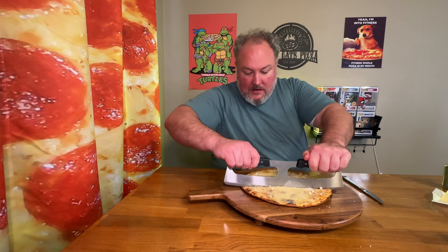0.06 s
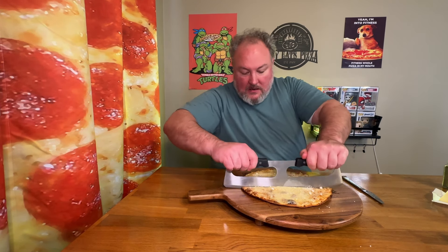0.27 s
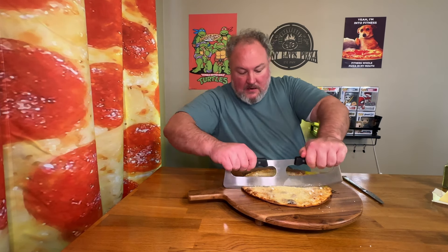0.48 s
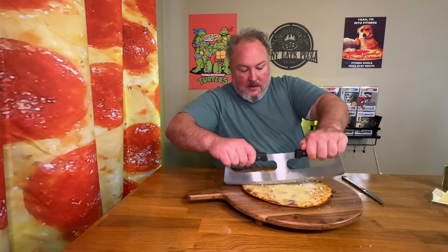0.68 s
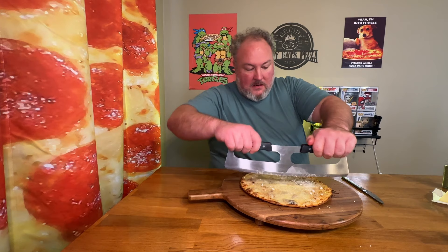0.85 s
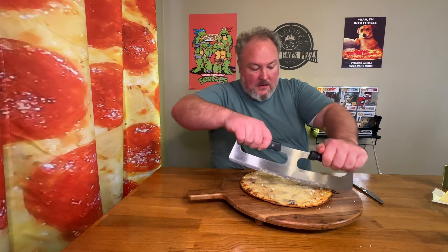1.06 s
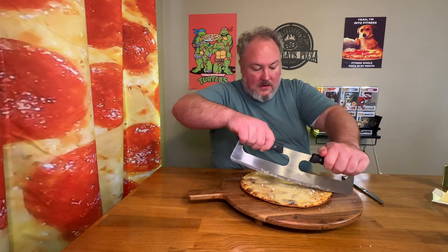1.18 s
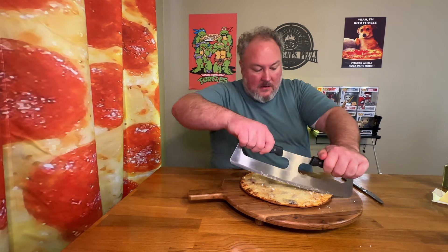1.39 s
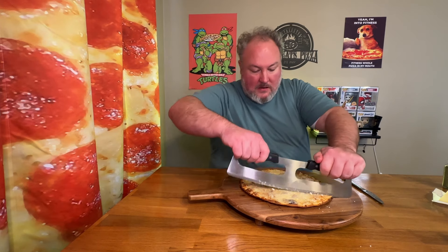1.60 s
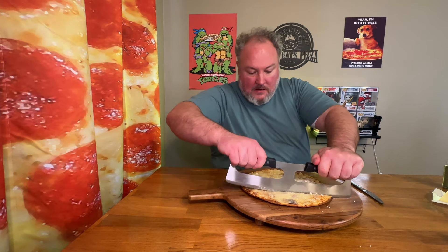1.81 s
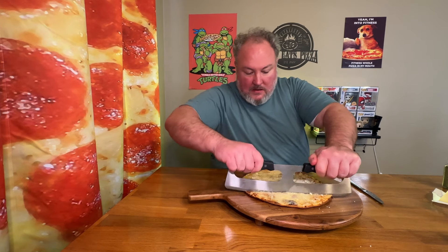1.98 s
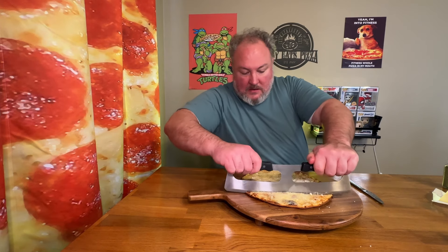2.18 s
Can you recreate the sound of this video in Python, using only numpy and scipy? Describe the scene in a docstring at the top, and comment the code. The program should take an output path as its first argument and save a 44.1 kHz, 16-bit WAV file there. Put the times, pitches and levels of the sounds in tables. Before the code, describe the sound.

Crisp pizza crust crackles and snaps under a steel blade, which hits a wooden board with a low thud. After a click and a short pause, longer crunching ends in two knocks, close by in a hushed kitchen.

```python
"""In a small, hushed kitchen a steel rocker cutter bites through crisp pizza crust, which crumbles and
snaps by brittle fracture and rasps the blade. The edge knocks on the wooden board and rings its modes;
each blow shakes the table and leaves a low boom. The cutter pulls clear with a click, comes down softly
on one end and rocks through the crust again, crunching, to two more firm knocks."""
import sys
import numpy as np
from scipy import signal
from scipy.fft import rfft, irfft, next_fast_len
from scipy.io import wavfile
from scipy.ndimage import map_coordinates

SR = 44100
rng = np.random.default_rng(int(sys.argv[2]) if len(sys.argv) > 2 else 0)


def to_wav(sig):
    """Store sig (one row per channel, or 1-D mono) as 16-bit WAV at the path in sys.argv[1].

    Samples outside -1..1 are clipped; the rate is SR.
    """
    pcm = np.clip(np.atleast_2d(sig), -1, 1) * 32767
    pcm = np.round(pcm).astype(np.int16)
    wavfile.write(sys.argv[1], SR, pcm.T)  # frames by channels


N = 99225

# blows of the blade on the board
# (time [s], ring level [dB], favoured pitch [Hz], thud level [dB], boom level [dB], boom pitch [Hz])
BLOWS = [(0.1672, -25.5, 1450, -42, -80, 79.3), (0.2181, -18, 2830, -22, -83, 81.8),
         (0.2207, -9.5, 600, -21, -30.5, 81.5), (.635, -42, 790, -40.5, -45.5, 81.5),
         (1.304, -37, 275, -35.5, -38, 57.8), (1.801, -39.5, 560, -52, -46, 89.2),
         (1.893, -19.5, 790, -25, -37, 79.1), (2.1325, -26, 950, -36, -48, 53.9)]
# dull spectrum of breaking crust (frequency [Hz], relative level [dB])
CRUNCH_SPECTRUM = [(300, -12), (650, -1), (1150, 1), (1500, 6), (2050, 0), (3000, 6), (4200, -11.5),
                   (12000, -60)]
# bright spectrum of breaking crust (frequency [Hz], relative level [dB])
CRISP_SPECTRUM = [(1000, -18), (3000, 0.5), (4900, 1), (6300, -7), (7600, 3), (8400, 1), (9900, -11),
                  (11800, -5.5), (13800, -5), (16000, -7.5)]
# response of the table (frequency [Hz], relative level [dB])
TABLE_SPECTRUM = [(25, -3), (60, 7.5), (140, -7.5), (260, -11), (500, -37.5), (1500, -66.5)]


def amp(db):
    """Amplitude ratio of a level in decibels."""
    return 10 ** (np.asarray(db) / 20)


def unit(x):
    """Normalisation to rms 1."""
    return x / np.sqrt(np.mean(x ** 2) + 1e-20)


def along(points, hz):
    """Interpolation of (frequency [Hz], value) points on a logarithmic frequency axis."""
    f, v = np.transpose(points)
    return np.interp(np.log(hz + 1), np.log(f + 1), v)


def colour(x, spectrum):
    """Minimum-phase filtering at unit energy, shaped by (frequency [Hz], level [dB]) points."""
    size = 4096
    cepstrum = irfft(np.log(amp(along(spectrum, np.fft.rfftfreq(size, 1 / SR)))))
    cepstrum[1:size // 2] *= 2  # folding onto positive time makes the filter causal
    cepstrum[size // 2 + 1:] = 0
    response = irfft(np.exp(rfft(cepstrum)))
    return signal.fftconvolve(x, response / np.linalg.norm(response))[:len(x)]


def add(track, start_s, sound):
    """Superposition of a sound on a track."""
    i = max(round(start_s * SR), 0)
    track[i:i + len(sound)] += sound[:N - i]


def wobble(knots_per_s):
    """Smooth random modulation: a spline through Gaussian values."""
    return map_coordinates(rng.standard_normal(1000), [np.arange(N) * knots_per_s / SR], mode="wrap")


def room_tone():
    """Stationary background noise, faint and strongest in the bass."""
    # (frequency [Hz], relative level [dB])
    hush_spectrum = [(25, 12), (62, -2.5), (110, -11.5), (480, -18.5), (1050, -28.5), (1400, -16.5),
                     (2100, -29.5), (16000, -43)]
    return amp(-58) * unit(colour(rng.standard_normal(N), hush_spectrum))


def bite_envelopes():
    """Amplitude envelopes of crunch and treble: each bite rises, holds and falls, advancing in jerks."""
    # the blade sinks into the crust (time [s], duration [s], crunch level [dB], treble level [dB])
    bites = [(0.01, 0.032, -53, -54), (0.054, 0.2, -56, -58), (0.165, 0.038, -46, -45),
             (0.381, 0.037, -55.5, -56), (0.557, 0.055, -67, -71), (0.625, 0.027, -51, -57.5),
             (1.247, 0.234, -87, -72.5), (1.473, .08, -56, -55), (1.567, .145, -47.5, -54.5),
             (1.619, 0.01, -43, -53.5), (1.751, 0.073, -51.5, -60.5), (1.784, 0.038, -42, -49.5),
             (1.883, 0.048, -40, -46), (1.989, 0.06, -42.5, -48), (2.06, 0.06, -58, -53.5),
             (2.14, 0.035, -43.5, -48)]
    rise_s, fall_s, jerk_db = 0.0032, 0.0071, 3.5
    t, gains = np.arange(N) / SR, 0
    for start, length, crunch_db, treble_db in bites:
        shape = np.exp(-np.maximum(start - t, 0) / rise_s - np.maximum(t - start - length, 0) / fall_s)
        gains = gains + amp([[crunch_db], [treble_db]]) * shape
    return gains * amp(jerk_db * wobble(knots_per_s=160))


def grains(per_s):
    """A Poisson process: sparse impulses of very uneven size, at rms 1."""
    hits = rng.random(N) < per_s / SR
    size_db = 4.3 * np.minimum(rng.exponential(size=N), 3)
    return unit(hits * amp(size_db) * rng.choice([-1, 1], N))


def blade(force):
    """Forced vibration of the steel's damped modes; it radiates little below the lowest."""
    # resonances of the blade in the cut (frequency [Hz], bandwidth [Hz], relative level [dB])
    modes = [(592, 24, 5), (923, 50, 3), (1425, 70, -5), (1790, 50, -4), (2420, 80, -3.5), (3040, 90, -4.5),
             (3370, 90, -9), (4360, 80, -6.5)]
    t = np.arange(SR // 10) / SR
    response = sum(amp(db) * width * np.exp(-np.pi * width * t) * np.sin(2 * np.pi * hz * t)
                   for hz, width, db in modes)
    response = signal.lfilter(*signal.butter(2, modes[0][0], "highpass", fs=SR), response)
    return signal.fftconvolve(force, response / np.linalg.norm(response))[:N]


def flaking(kinds=12, flakes_per_s=1000, decay_s=.00025):
    """Shot noise of flakes chipping off, each kind with its own spectrum, at rms 1."""
    t = np.arange(SR // 200) / SR
    chips = rng.standard_normal((kinds, len(t))) * np.exp(-t / decay_s)
    return unit(sum(np.convolve(grains(flakes_per_s / kinds), unit(chip))[:N] for chip in chips))


def crumbling():
    """Acoustic emission: tiny cells of crust fail and rasp the blade; pressing hands rumble the table."""
    crunch, treble = bite_envelopes()
    cells = amp(-4.5) * grains(per_s=1200) * crunch
    rasp = blade(cells) + amp(-6) * colour(cells, CRUNCH_SPECTRUM)
    fizz = amp(-1) * colour(flaking() * treble, CRISP_SPECTRUM)
    rumble = amp(-7.5) * crunch * unit(colour(rng.standard_normal(N), TABLE_SPECTRUM))
    return rasp + fizz + rumble


def kitchen(x, wall_delay_s=.008):
    """Reverberation: reflections decay exponentially, the treble first and the midrange last."""
    # decay of the room (frequency [Hz], reverberation time T60 [s])
    decay_times = [(100, 0.37), (1500, 0.66), (4000, 0.4), (16000, 0.33)]
    hz, t, noise = signal.stft(rng.standard_normal(SR), SR, nperseg=256)
    decay = amp(-60 * t / along(decay_times, hz)[:, None])
    tail = signal.istft(noise * decay, SR, nperseg=256)[1]
    tail = np.pad(tail / np.linalg.norm(tail), (round(wall_delay_s * SR), 0))
    return signal.fftconvolve(x, tail)[:N]


def snaps():
    """Brittle fracture: each larger break is a tick, splinters and a dull crack that rings the blade."""
    # breaks in the crust (time [s], relative tick level [dB], relative crack level [dB])
    fractures = [(0.0324, -34.5, -48.5), (0.104, -39.5, -54), (0.1394, -37.5, -50.5), (0.166, -18, -27.5),
                 (0.2009, -29, -31), (0.2175, -21.5, -19), (0.3391, -40, -62), (1.2205, -51.5, -64),
                 (1.2492, -47, -68), (1.2905, -37, -65), (1.3404, -47, -73), (1.3628, -42, -76.5),
                 (1.3928, -41, -55.5), (1.484, -35.5, -58), (1.5151, -31, -53.5), (1.5432, -38.5, -47),
                 (1.5712, -32.5, -41), (1.5906, -31.5, -42.5), (1.6408, -36.5, -46), (1.78, -31.5, -58),
                 (1.787, -34.5, -50), (1.8461, -35, -35), (1.8888, -26, -30), (1.9308, -34, -47),
                 (1.9425, -34, -66), (1.9875, -25.5, -45.5), (2.0665, -38.5, -59), (2.0765, -29.5, -68),
                 (2.084, -31.5, -41), (2.1301, -20, -33.5), (2.1515, -31.5, -37.5)]
    splinter_s, crack_rise_s, crack_decay_s = 0.005, 0.00079, 0.0035
    ticks, cracks, t = np.zeros(N), np.zeros(N), np.arange(SR // 20) / SR
    crack_shape = np.exp(-t / crack_decay_s) * (1 - np.exp(-t / crack_rise_s))
    for start, tick_db, crack_db in fractures:
        tick_noise, splinter_noise, crack_noise = rng.standard_normal((3, len(t)))
        tick_s = .005 * 2 ** (crack_db / 13)  # heavier cracks take longer to break
        tick = tick_noise * np.exp(-t / tick_s)
        tick = amp(10.5) * tick / np.linalg.norm(tick)
        splinters = amp(-17) * splinter_noise * np.exp(-t / splinter_s)
        add(ticks, start + .001, amp(tick_db) * (tick + splinters))
        add(cracks, start + .001, amp(crack_db + 3.5) * crack_noise * crack_shape)
    return colour(ticks, CRISP_SPECTRUM) + colour(cracks, CRUNCH_SPECTRUM) + amp(-3) * blade(cracks)


def knocks(pitch_spread=0):
    """Free vibration: each blow rings the board's modes most strongly near its own favoured pitch."""
    # resonances of the wooden board (frequency [Hz], relative level [dB], decay time T60 [s])
    modes = [(120.2, 1, .2), (185.8, 1.5, 0.12), (272, -4, 0.08), (404.7, -10.5, 0.19), (489, -9.5, 0.12),
             (516.9, -8, 0.13), (597.4, 1.5, 0.074), (681.2, -5, 0.11), (923.6, 1.5, 0.038),
             (1016, -6, 0.059), (1443, 0.5, 0.026), (1930, -1, 0.035), (2880, -3, 0.012)]
    falloff_db_per_octave, contact_s = 9, 0.00047
    out, t = np.zeros(N), np.arange(SR // 3) / SR
    for start, ring_db, favoured_hz, *_ in BLOWS:
        ring = 0
        for hz, mode_db, t60 in modes:
            excited_db = mode_db - falloff_db_per_octave * abs(np.log2(hz / favoured_hz))
            detuned_hz = hz * (1 + pitch_spread * rng.normal())
            ring = ring + amp(excited_db - 60 * t / t60) * np.sin(2 * np.pi * detuned_hz * t)
        add(out, start, amp(ring_db) * ring * (1 - np.exp(-t / contact_s)))
    return out


def thuds(rise_s=0.00033, decay_s=0.02):
    """Structure-borne sound: every blow sends a short, low burst through the table."""
    out, t = np.zeros(N), np.arange(SR // 3) / SR
    shape = np.exp(-t / decay_s) * (1 - np.exp(-t / rise_s))
    for start, _, _, thud_db, *_ in BLOWS:
        thud = unit(colour(rng.standard_normal(len(t)), TABLE_SPECTRUM))
        add(out, start, amp(thud_db) * thud * shape)
    return out


def booms(peak_s=0.087, waver_db=1.5):
    """Low-frequency resonance: after each blow one tone swells, wavers and dies."""
    out, t = np.zeros(N), np.arange(SR) / SR
    swell = (t / peak_s * np.exp(1 - t / peak_s)) ** 1.9
    for start, *_, boom_db, boom_hz in BLOWS:
        add(out, start, amp(boom_db) * swell * np.sin(2 * np.pi * boom_hz * t))
    return out * amp(waver_db * wobble(knots_per_s=25))


def click(at_s=.6358, width_s=0.0011):
    """A release transient: the steel edge pulls free of the cut, duller than the snapping crust."""
    # (frequency [Hz], relative level [dB])
    click_spectrum = [(500, -18), (2000, 2), (8500, -1), (10500, -25.5), (16000, -25)]
    t = np.arange(N) / SR
    burst = amp(-31) * rng.standard_normal(N) * np.exp(-np.abs(t - at_s) / width_s)
    return colour(burst, click_spectrum)


def wall_reflections(walls=3):
    """Incoherent summation: each wall hears another side of the transients and adds its own tail."""
    lowpass = signal.butter(2, 2060, fs=SR)  # the board sends little treble to the walls
    out = np.zeros(N)
    for _ in range(walls):
        sharp = amp(-14) * (snaps() + click())
        wood = amp(-14.5) * signal.lfilter(*lowpass, knocks(pitch_spread=.045))
        out += kitchen(sharp + wood)
    return out / np.sqrt(walls)


def scene():
    """Superposition of direct sound, reverberant field and room tone, in mono."""
    crumbs, table = crumbling(), thuds()
    reverberation = kitchen(amp(-9.5) * crumbs + amp(-6) * table) + wall_reflections()
    return (room_tone() + crumbs + snaps() + knocks() + table + booms() + click() + reverberation)[None]


def record(dry):
    """Band limiting by an ideal low-pass filter."""
    cutoff_hz, size = 16300, next_fast_len(N + SR // 2)
    passband = np.fft.rfftfreq(size, 1 / SR) < cutoff_hz
    return irfft(rfft(dry, size) * passband, size)[:, :N]


dry = scene()
out = record(dry)
to_wav(out)
```